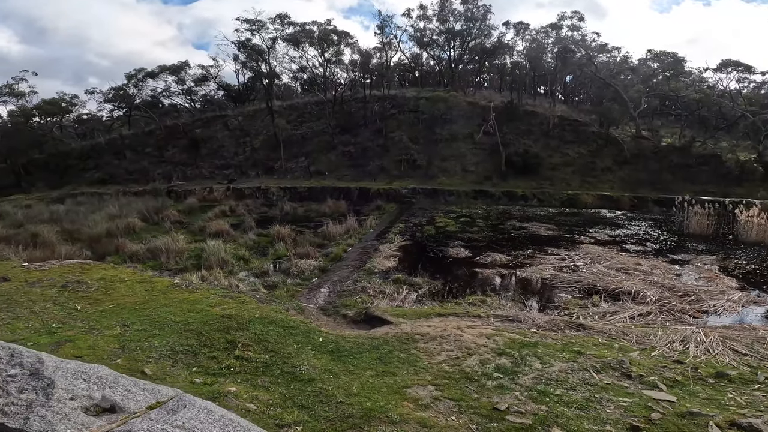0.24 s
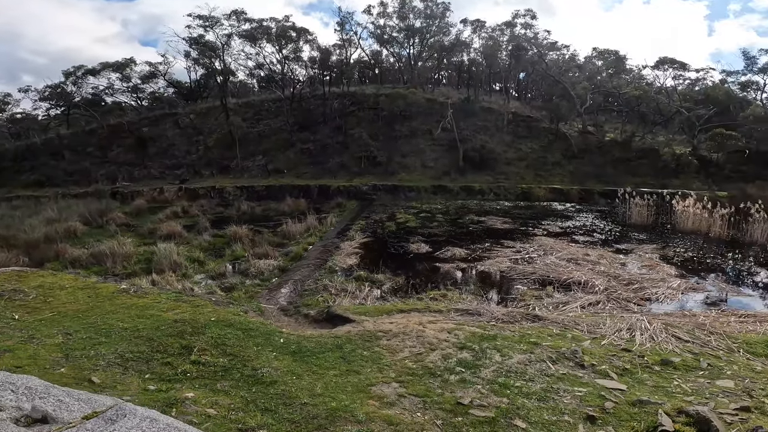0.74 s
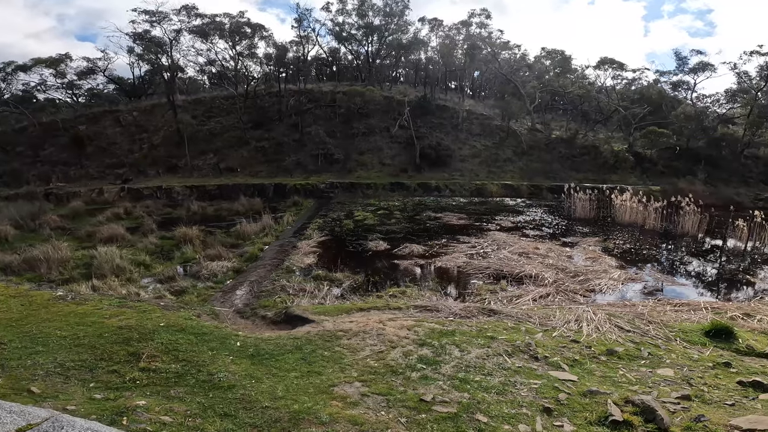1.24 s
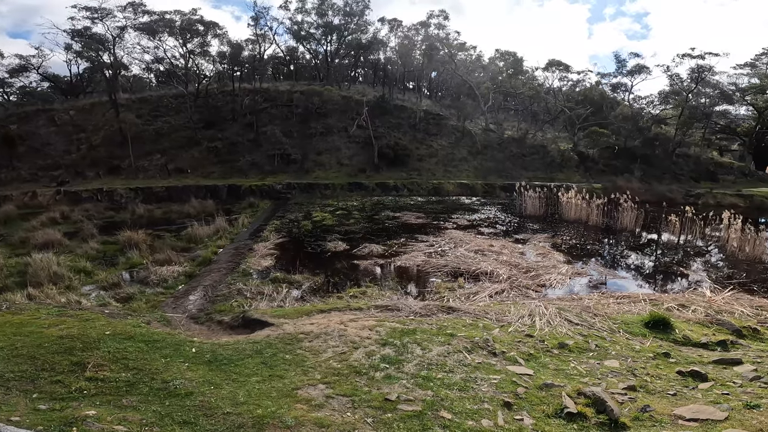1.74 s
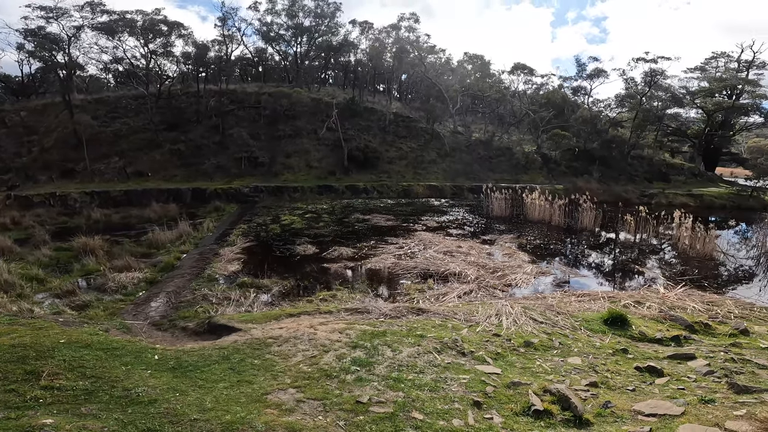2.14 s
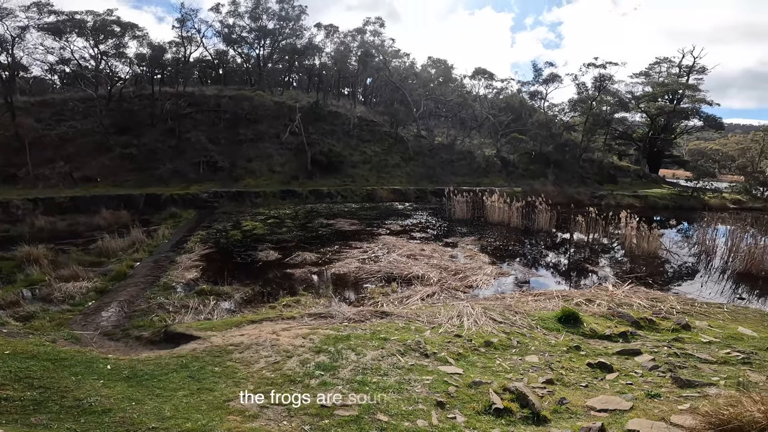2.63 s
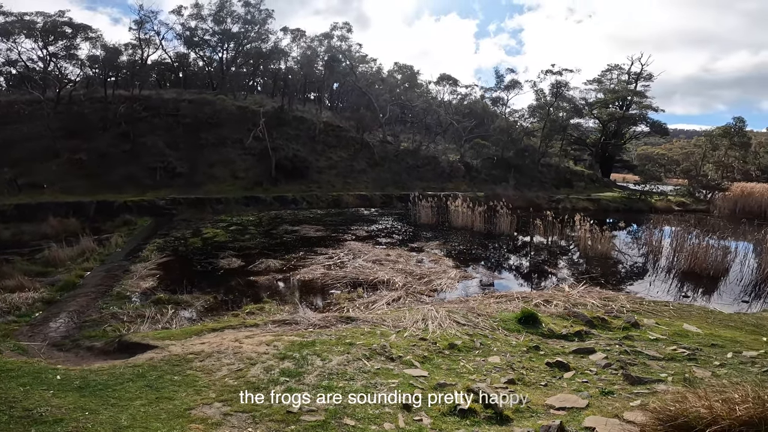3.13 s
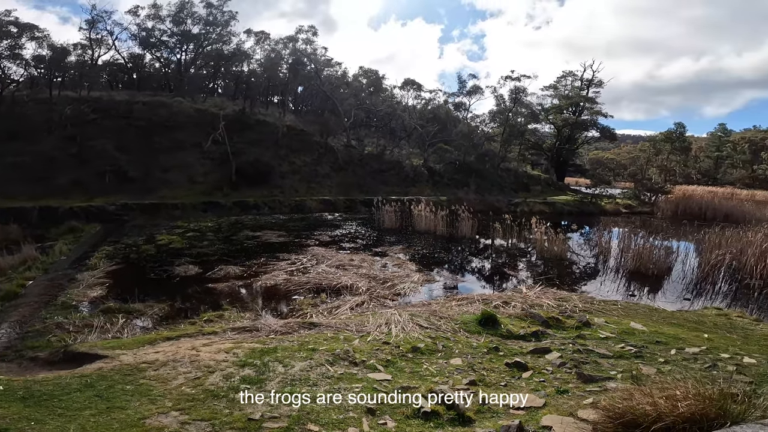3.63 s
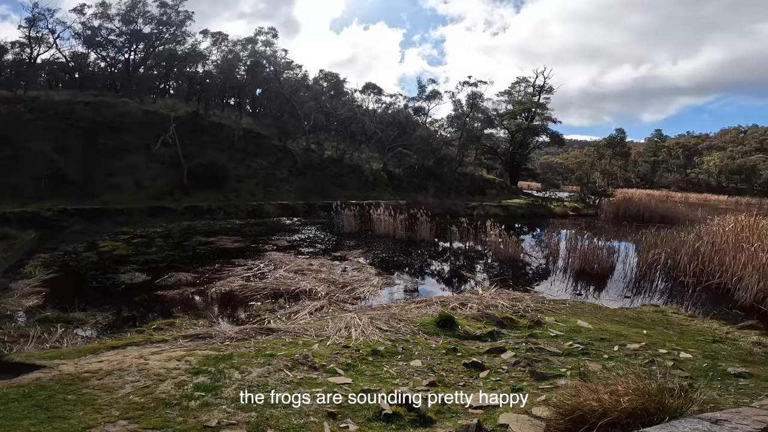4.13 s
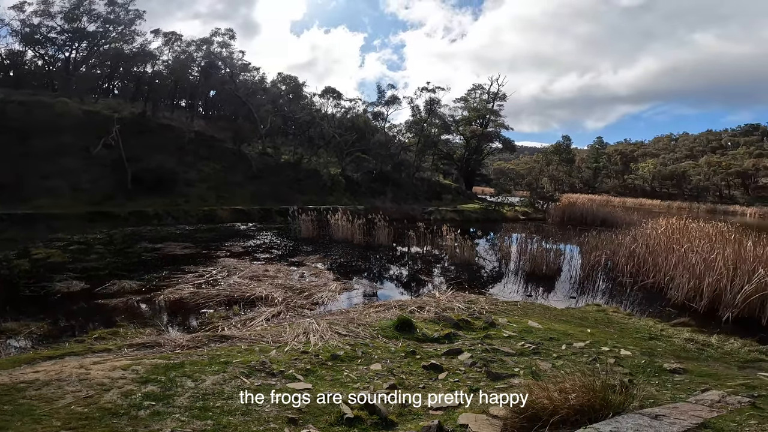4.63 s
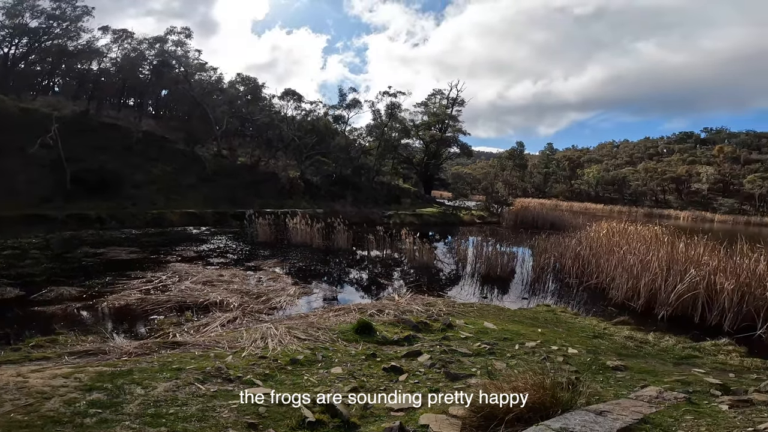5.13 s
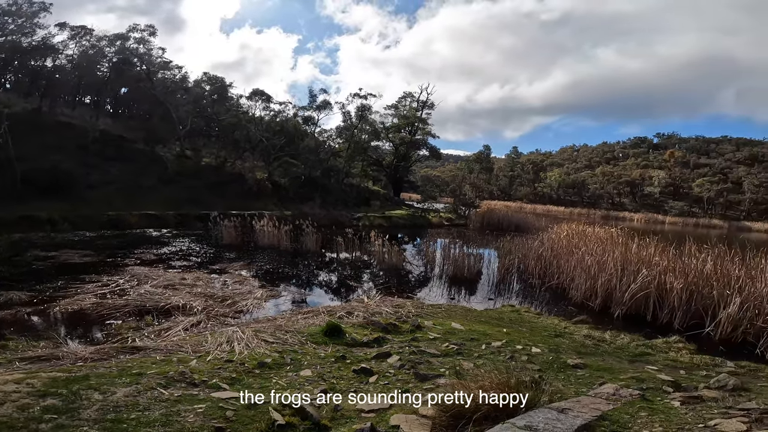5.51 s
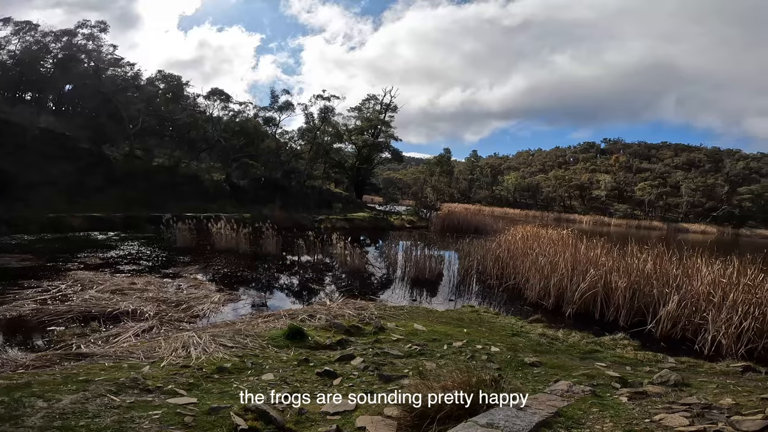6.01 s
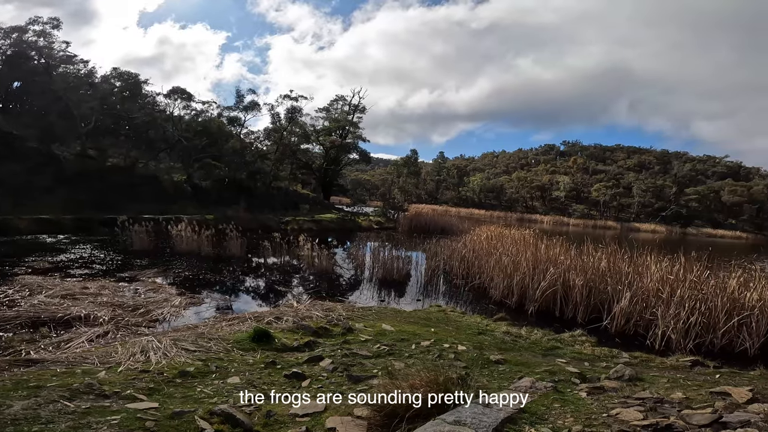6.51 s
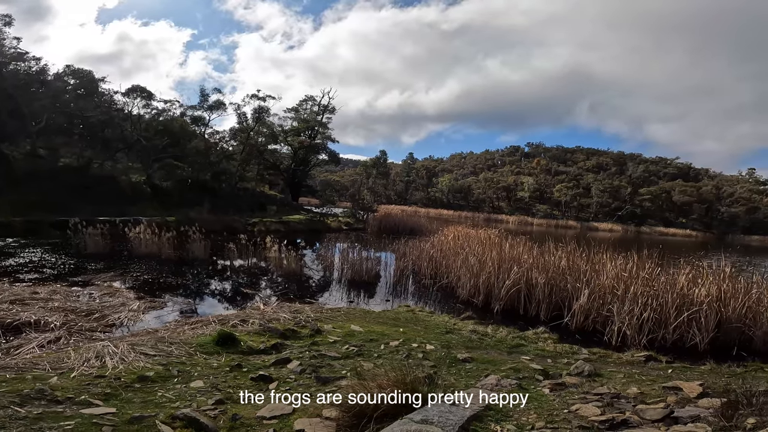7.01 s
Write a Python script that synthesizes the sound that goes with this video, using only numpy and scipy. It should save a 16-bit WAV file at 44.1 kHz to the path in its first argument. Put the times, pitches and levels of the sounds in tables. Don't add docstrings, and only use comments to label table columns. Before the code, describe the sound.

From the first instant a crowd of small frogs calls without pause at an outdoor pond, heard from the grassy bank. Each call is a quick train of about nine dry clicks, swelling then dropping off, with a tight, hollow ring around 2.7 to 2.9 kHz; the smallest frogs add higher, purer ticks. Near frogs surge out irregularly about four times a second, with sharp single clicks strongest from 0.5 to 3 s. Behind them a dense distant chorus blurs into short echoes off reeds and slope. Light, low wind stays steady and faint, with barely perceptible grass rustle and a weak far hum. A fly drones softly from about 2 s, its pitch sinking as it leaves near 3.1 s. From about 4.6 s the microphone turns away and the chorus softens, sparser in loud near clicks after 5.5 s, continuing until the cut near 7.3 s.

```python
import sys
import numpy as np
from scipy import signal
from scipy.fft import rfft, irfft
from scipy.io import wavfile
from scipy.ndimage import uniform_filter1d, map_coordinates

SR = 44100
rng = np.random.default_rng(int(sys.argv[2]) if len(sys.argv) > 2 else 0)


def gain_from_db(level_db):
    decades = np.asarray(level_db, float) / 20
    return 10 ** decades


def generate_wav(sig):
    pcm = np.round(np.clip(np.atleast_2d(sig).T, -1, 1) * 32767).astype(np.int16)
    wavfile.write(sys.argv[1], SR, pcm)


N = 320166

# peak time in seconds, peak in dB, sac resonance in Hz.
NEAR = [(0.0626, -14, 2870), (0.0941, -12, 2840), (0.409, -14, 2820), (0.5432, -9.5, 2560),
        (0.57, -10.5, 2720), (0.837, -9.5, 2740), (1.0977, -13, 2880), (1.4195, -9.5, 2730),
        (1.6711, -8.5, 2910), (1.92, -13.5, 2850), (1.9776, -8.5, 2740), (2.1439, -9.5, 2900),
        (2.3056, -11, 2690), (2.9178, -9.5, 2740), (3.027, -12, 2940), (3.3878, -13.5, 3090),
        (3.8061, -12.5, 2930), (4.201, -10, 2940), (4.346, -11, 2790), (4.4945, -17, 2720),
        (4.5485, -14.5, 2830), (4.8441, -9, 2850), (4.9044, -10, 2840), (5.252, -11.5, 2730),
        (5.4069, -12, 2870), (5.4261, -11.5, 2900), (5.5159, -14.5, 2740), (6.4318, -12.5, 2830),
        (6.5784, -13.5, 2770), (7.101, -10.5, 2750)]
# time in seconds, swell in dB, sac resonance in Hz.
SURGES = [(0.072, 1.5, 2855), (.25, 1, 2900), (.57, 2.5, 2680), (.86, 2, 2600), (1.17, 4, 2750),
          (1.431, 2, 2750), (1.70, 2, 2910), (1.97, 2, 2640), (2.17, 0, 2700), (2.32, 1, 2700),
          (2.42, 0.5, 2830), (2.69, 2, 2790), (2.91, 1.5, 2780), (3.23, 2, 2750), (3.401, 3, 2820),
          (3.728, 2, 2790), (3.92, 1, 2650), (4.07, 1, 2750), (4.30, 0.5, 2900), (4.53, 1.5, 2600),
          (4.82, 1.5, 2930), (4.98, 2.5, 2850), (5.421, 3.5, 2750), (5.65, 0, 2660), (5.899, 3, 2780),
          (6.139, 1, 2880), (6.42, 1, 2990), (6.57, 0, 2750), (6.93, 1.5, 2680), (7.11, -1, 2750)]
# time in seconds, crowd level in dB.
FACING = [
    (0.0, -24.5),
    (1.72, -26),
    (1.82, -25.5),
    (4.63, -27),
    (5.84, -30),
    (5.96, -29),
    (7.26, -30.5),
]
# frequency in Hz, level in dB per Hz.
THROAT = [(900, -65), (1500, -36), (1800, -20.5), (2150, -8.5), (2850, -2), (3350, -9), (3700, -21),
          (4100, -28.5), (5000, -34.5), (5600, -37.5), (6100, -45), (7500, -51.5), (8600, -68),
          (9100, -95.5)]
# frequency in Hz, level in dB per Hz.
SMALL = [(1200, -50), (2000, -20), (2700, -5), (3300, -2), (3750, -3), (4200, -9), (4650, -15), (5100, -28),
         (5800, -38), (6800, -46), (7500, -50), (8600, -70), (9100, -90)]
# time in seconds, wind level in dB, rustle level in dB.
AIR = [(0.0, -45, -79), (0.2, -46, -82), (1.01, -46.5, -87), (3.05, -47, -87.5), (3.21, -48, -86),
       (4.29, -47.5, -85.5), (5.26, -46.5, -79.5), (5.52, -46.5, -89), (5.92, -45.5, -79.5),
       (6.33, -48, -85), (6.57, -46.5, -77), (6.69, -48, -83.5), (7.1, -47.5, -84.5), (7.26, -48.5, -84.5)]


def along(points, hz):
    f, v = np.transpose(points)
    return np.interp(np.log(hz + 1), np.log(f + 1), v)


def curves(rows):
    s, *cols = np.transpose(rows)
    return [np.interp(np.arange(N) / SR, s, c) for c in cols]


def unit(x):
    return x / np.sqrt(np.mean(x ** 2) + 1e-20)


def wobble(rate):
    knots = rng.standard_normal(int(N * rate / SR) + 4)
    return map_coordinates(knots, [np.arange(N) * rate / SR])


def clicks(s, db, throat, sac_hz, width_hz, ring_db, octave_db):
    size = 512
    hz = np.fft.rfftfreq(2 * size, 1 / SR)
    lift_db = ring_db / (1 + ((hz - sac_hz[:, None]) / width_hz) ** 2)
    lift_db += octave_db / (1 + ((hz - 2 * sac_hz[:, None]) / 300) ** 2)
    cepstrum = irfft(np.log(gain_from_db(along(throat, hz) + lift_db)))
    cepstrum[:, 1:size] *= 2
    cepstrum[:, size + 1:] = 0
    lag_s = rng.uniform([.0004, .0015], [.0015, .004], (len(s), 2))[:, :, None]
    bounce = 1 + (gain_from_db([[-8], [-9]]) * np.exp(-2j * np.pi * hz * lag_s)).sum(axis=1)
    shape = irfft(np.exp(rfft(cepstrum)) * bounce)[:, :size]
    shape *= (gain_from_db(db) / np.abs(shape).max(axis=1))[:, None]
    start = np.round(s * SR).astype(int) - np.abs(shape).argmax(axis=1) + size
    places = start[:, None] + np.arange(size)
    return np.bincount(places.ravel(), shape.ravel(), N + 2 * SR)[size:N + size]


def call(top_s, top_db, gap_s, uneven_db):
    rise_db, fall_db, hurry = 1.0, 2.5, .2
    step = np.arange(-6, 3)
    after = np.maximum(step, 0)
    s = top_s[:, None] + gap_s[:, None] * (step - hurry * after * (after + 1) / 2)
    db = top_db[:, None] + rise_db * np.minimum(step, 0) - fall_db * after
    db = db + uneven_db * rng.standard_normal(s.shape)
    return np.maximum(s, 0), np.where(s > 0, db, -120)


def loudest_clicks():
    s, db, hz = np.transpose(NEAR)
    return clicks(s + 0.0012, db - 0.74, THROAT, hz, width_hz=280, ring_db=13, octave_db=6.5)


def leading_calls():
    s, swell_db, hz = np.transpose(SURGES)
    gap_s = .028 * rng.uniform(.8, 1.2, len(s))
    facing_db = np.interp(s, np.arange(N) / SR, curves(FACING)[0])
    lead_db = 10
    s, db = call(s + 1.5 * gap_s, facing_db + lead_db + swell_db, gap_s, uneven_db=1.6)
    hz = np.repeat(hz, s.shape[1])
    return clicks(s.ravel(), db.ravel(), THROAT, hz, width_hz=340, ring_db=9, octave_db=8.5)


def smallest_calls():
    # loudest click in seconds, its peak in dB, gap between clicks in seconds.
    bright = [(.098, -24.5, 0.04), (.279, -26.5, 0.049), (.544, -29, 0.034), (.605, -27, .030),
              (.765, -27, 0.082), (1.023, -27.5, 0.029), (1.186, -31.5, .033), (1.493, -28.5, 0.023),
              (1.672, -29, .032), (1.953, -28, 0.033), (2.093, -33, .034), (2.391, -29.5, .033),
              (2.622, -30.5, .034), (2.740, -27.5, .028), (2.904, -31.5, 0.026), (3.203, -31.5, 0.041),
              (3.359, -27.5, 0.021), (3.504, -32.5, .030), (3.786, -32, 0.026), (3.975, -35, 0.039),
              (4.331, -25, .0285), (4.70, -34, 0.042), (5.001, -25, 0.022), (5.366, -36, .030),
              (5.630, -35, 0.043), (6.107, -28.5, 0.043), (6.541, -41.5, .030), (6.756, -38, 0.044),
              (6.955, -28, 0.036), (7.102, -35, 0.038)]
    s, db = call(*np.transpose(bright), uneven_db=.8)
    hz = 3720 + 0 * s.ravel()
    return clicks(s.ravel(), db.ravel() + 8, SMALL, hz, width_hz=140, ring_db=6.5, octave_db=1)


def crowd(throat, count, sac_hz, spread, far_db, width_hz, ring_db, octave_db):
    turn, pace, pitch, far = rng.uniform(size=(count, 4)).T[:, :, None]
    step = np.arange(9)
    begin = (np.arange(count)[:, None] + turn) / count * (N / SR + .2) - .2
    s = begin + (.022 + .012 * pace) * (step - .015 * step ** 2) + rng.normal(0, .0008, (count, 9))
    swell_db = -7 * ((step - 5.5) / 5.5) ** 2 + rng.normal(0, 1.2, (count, 9))
    hz = sac_hz * np.exp(spread * (2 * pitch - 1)) + 0 * step
    gap_s = np.abs(s[..., None] - np.transpose(NEAR)[0] + .002).min(axis=-1)
    heard = (s > 0) & (gap_s > .004)
    db = (swell_db - far_db * far)[heard]
    chorus = clicks(s[heard], db, throat, hz[heard], width_hz, ring_db, octave_db)
    effort = np.sqrt(np.abs(uniform_filter1d(chorus ** 2, SR // 4)) + 1e-12)
    return chorus / effort


def slope(x):
    # frequency in Hz, time to fall 60 dB in seconds.
    decay = [(1500, 0.6), (3000, 0.53), (8000, 0.39)]
    piece = SR // 3
    x = np.pad(x, (piece // 2, 2 * piece))
    answer = np.zeros(N + 3 * SR)
    blend = np.sin(np.pi * np.arange(2 * piece) / (2 * piece))
    for start in range(0, N + piece // 2, piece):
        hz, t, z = signal.stft(rng.standard_normal(SR // 2), SR, nperseg=256)
        fade = gain_from_db(-60 * t / along(decay, hz)[:, None])
        tail = signal.istft(z * fade, SR, nperseg=256)[1]
        echo = signal.fftconvolve(x[start:start + 2 * piece] * blend, tail / np.linalg.norm(tail))
        answer[start:start + len(echo)] += echo
    return answer[piece // 2:][:N]


def frogs():
    t = np.arange(N) / SR
    facing_db, = curves(FACING)
    surge_s = .055
    surge_db = sum(db * np.exp(-((t - s) / surge_s) ** 2) for s, db, _ in SURGES)
    crowd_db = facing_db + 2 + surge_db + 1.0 * wobble(32)
    small_db = facing_db - 17 + .6 * surge_db
    hush_s, hush_db = .005, 4.5
    hush = gain_from_db(-hush_db * sum(np.exp(-((t - s + hush_s) / hush_s) ** 2) for s, _, _ in NEAR))
    near = leading_calls() + smallest_calls()
    middle = crowd(THROAT, count=260, sac_hz=2720, spread=.19, far_db=12.0,
                   width_hz=330, ring_db=12.5, octave_db=4.5)
    small = crowd(SMALL, count=90, sac_hz=3550, spread=.08, far_db=8,
                  width_hz=350, ring_db=8, octave_db=5)
    farthest = crowd(THROAT, count=200, sac_hz=2750, spread=0.31, far_db=8.5,
                     width_hz=170, ring_db=2, octave_db=5.0)
    farthest = farthest * np.minimum(1, t / .01)
    behind = gain_from_db(crowd_db - 4.5) * middle + gain_from_db(small_db) * small
    direct = loudest_clicks() + hush * (near + behind)
    melted = hush * gain_from_db(crowd_db - 6.5) * unit(slope(farthest))
    return direct + gain_from_db(-17.5) * slope(direct) + melted


def rush(spectrum, patchy_db):
    hz, _, z = signal.stft(rng.standard_normal(N), SR, nperseg=2048)
    field = uniform_filter1d(rng.standard_normal(z.shape), 12, 0)
    field = uniform_filter1d(field, 3, 1)
    gain = gain_from_db(along(spectrum, hz)[:, None] + patchy_db * unit(field))
    return unit(signal.istft(z * gain, nperseg=2048)[1][:N])


def wind():
    # frequency in Hz, level in dB per Hz.
    wind_colour = [(15, -62), (25, -29), (58, -20), (91, -22), (146, -5), (286, -1.5), (444, -6), (700, -5),
                   (1700, -10.5), (4000, -23), (5800, -29), (7500, -38), (8600, -51), (9100, -70)]
    wind_db, _ = curves(AIR)
    return gain_from_db(wind_db + 1.36 + 0.31 * wobble(6)) * rush(wind_colour, patchy_db=1.25)


def rustle():
    # frequency in Hz, level in dB per Hz.
    grass_colour = [(8000, -62), (9100, -21), (9400, -9.5), (10500, -4.5), (11400, -5), (11800, -1.5),
                    (12500, -4), (13000, -11), (13500, -20), (14500, -83)]
    # time in seconds, peak in dB.
    ticks = [
        (.70, -72),
        (.828, -70),
        (4.06, -68),
        (6.367, -68),
        (7.037, -68),
        (7.102, -71),
    ]
    _, rustle_db = curves(AIR)
    level = gain_from_db(rustle_db + 2.2 * wobble(150))
    t = np.arange(N) / SR
    for s, db in ticks:
        level = level + gain_from_db(db - 60 * np.abs(t - s) / .03) * (t >= s)
    return level * rush(grass_colour, patchy_db=.8)


def tone(rows, waver, flutter_db, octave_db):
    hz, db = curves(rows)
    phase = 2 * np.pi * np.cumsum(hz * (1 + waver * wobble(14))) / SR
    octave = gain_from_db(octave_db + 3 * wobble(11)) * np.sin(2 * phase)
    return gain_from_db(db + 5.0 + flutter_db * wobble(13)) * (np.sin(phase) + octave)


def hum():
    # time in seconds, pitch in Hz, level in dB.
    hum_path = [(0, 116.1, -85.5), (1.7, 117, -72), (2.1, 118, -64), (2.9, 118, -60), (3.1, 117.5, -70),
                (4.3, 116, -66), (4.6, 116, -63), (5.0, 116.1, -60), (5.4, 115.8, -64), (6.35, 117.4, -71),
                (6.9, 116.4, -64), (7.26, 114.6, -64)]
    return tone(hum_path, waver=.02, flutter_db=3, octave_db=-5)


def fly():
    # time in seconds, pitch in Hz, level in dB.
    flight = [
        (1.7, 236, -79),
        (2.1, 240, -55),
        (2.35, 238, -58),
        (2.55, 244, -55),
        (2.7, 236, -57),
        (2.93, 240, -56),
        (3.0, 200, -52),
        (3.08, 160, -59),
        (3.2, 151, -83),
    ]
    return tone(flight, waver=.022, flutter_db=4, octave_db=-18)


def scene():
    return (frogs() + wind() + rustle() + hum() + fly())[None]


def band_limit(x):
    return signal.sosfilt(signal.butter(12, 13450, fs=SR, output="sos"), x)


def record(dry):
    to_edge = np.minimum(np.arange(N), N - np.arange(N))
    mix = dry * np.minimum(1, to_edge / (.002 * SR))
    return band_limit(mix)


dry = scene()
out = record(dry)
generate_wav(out)
```